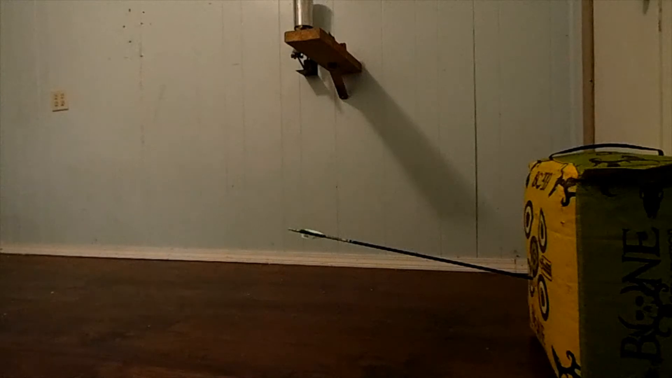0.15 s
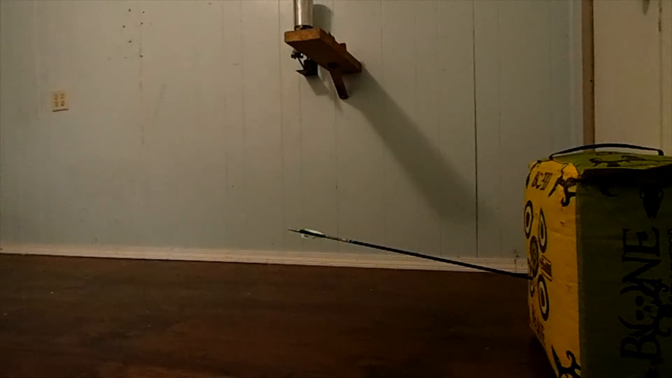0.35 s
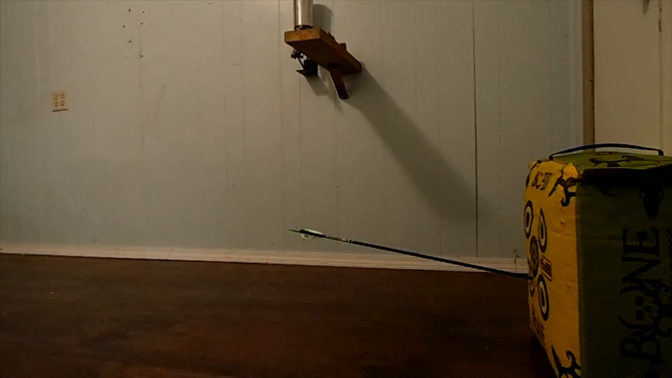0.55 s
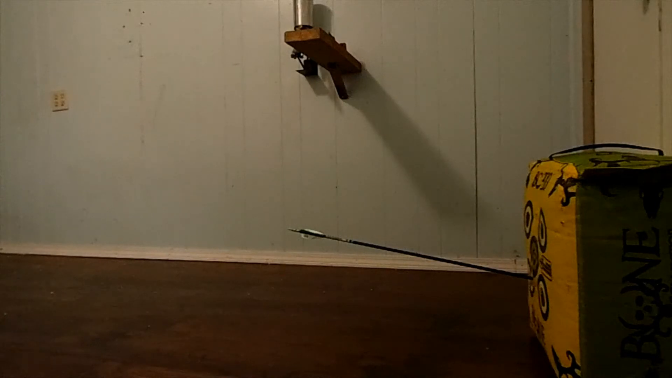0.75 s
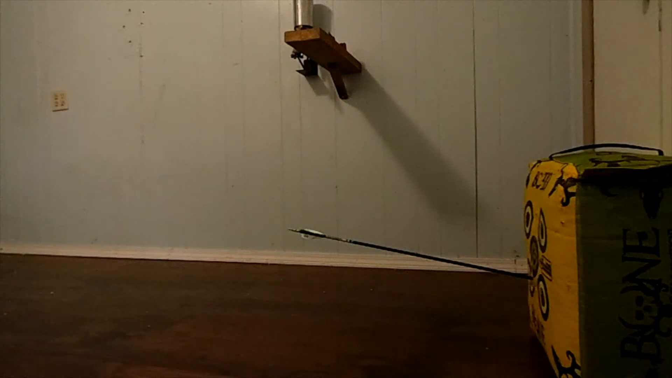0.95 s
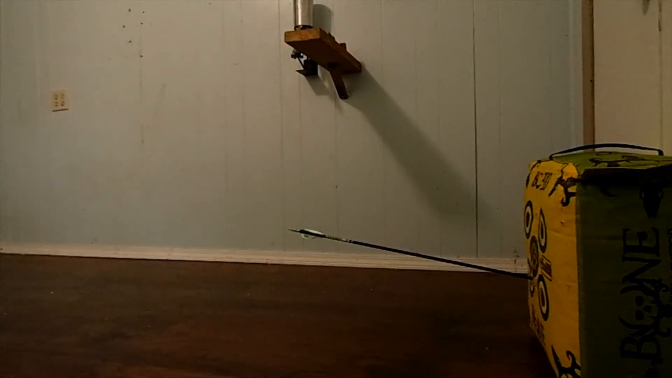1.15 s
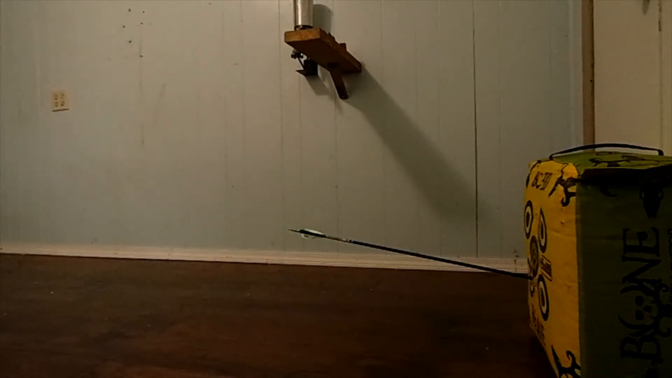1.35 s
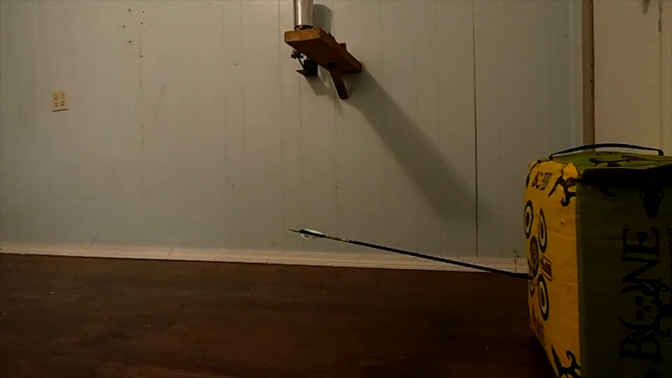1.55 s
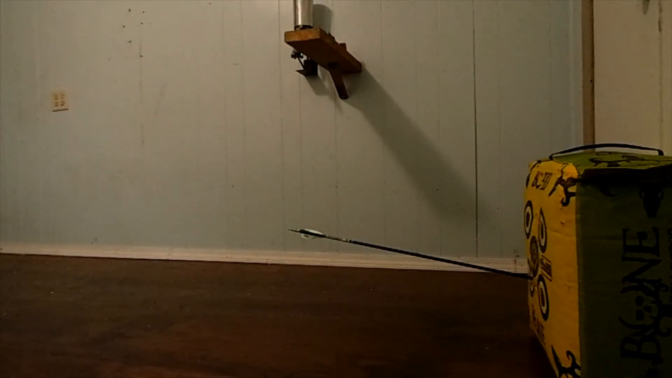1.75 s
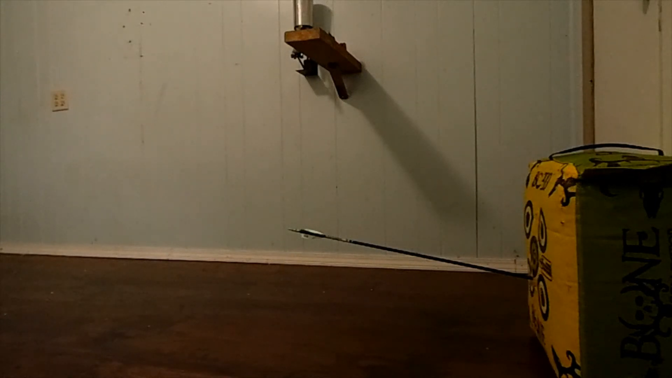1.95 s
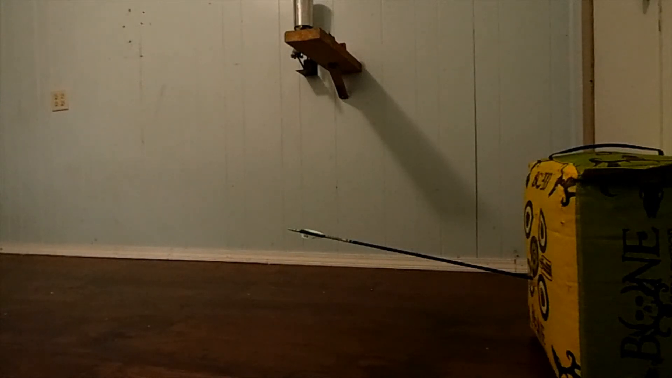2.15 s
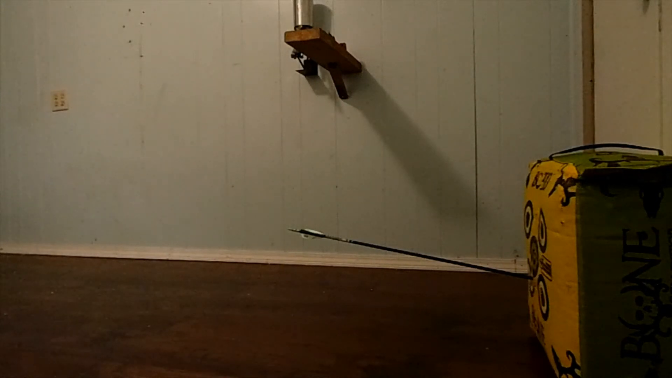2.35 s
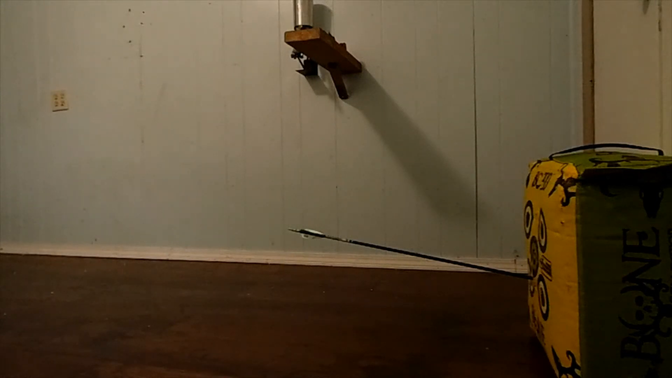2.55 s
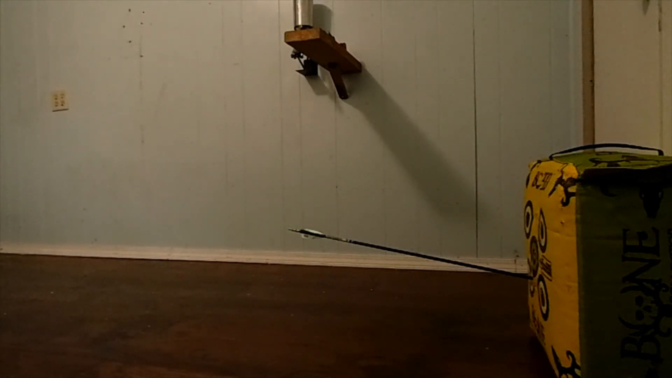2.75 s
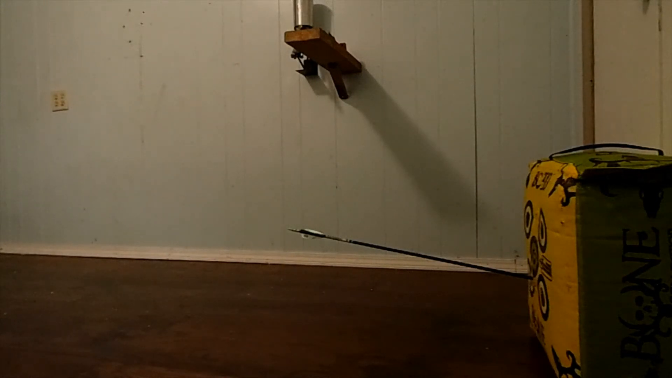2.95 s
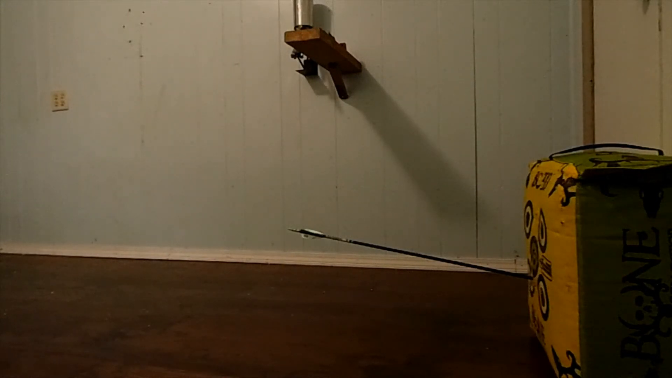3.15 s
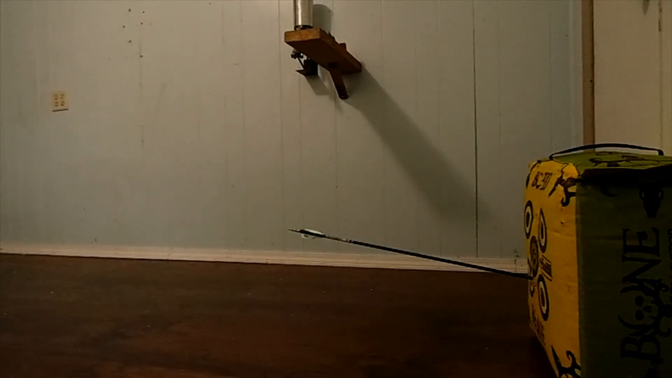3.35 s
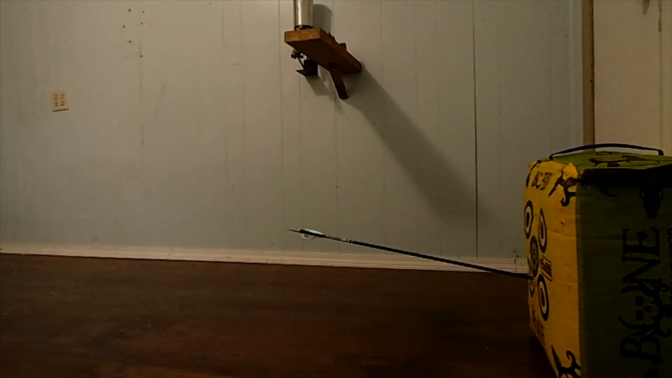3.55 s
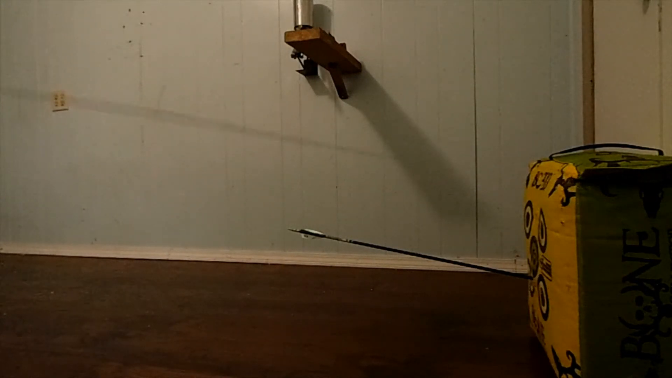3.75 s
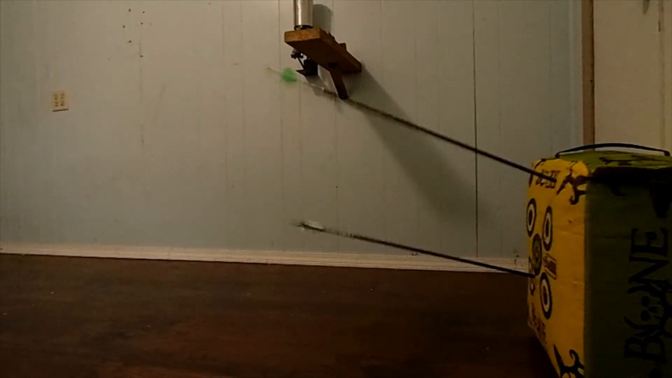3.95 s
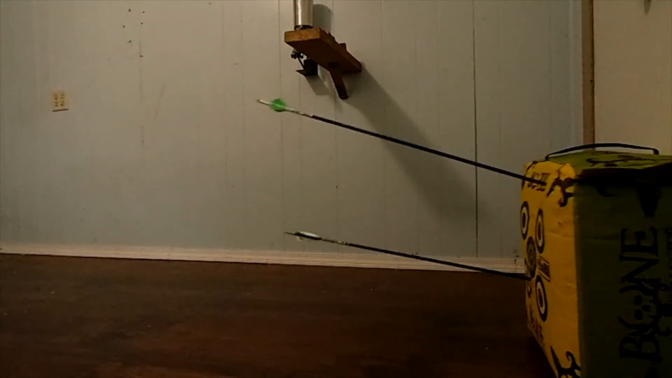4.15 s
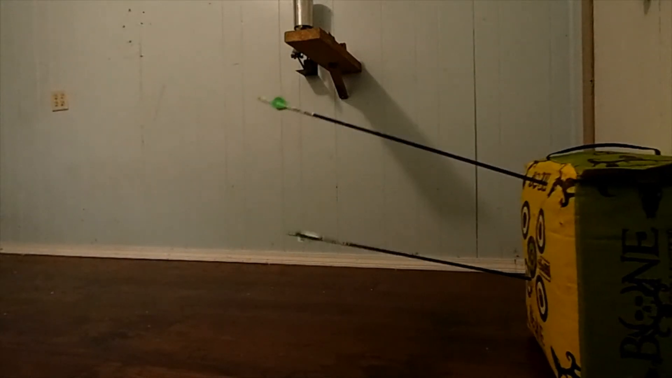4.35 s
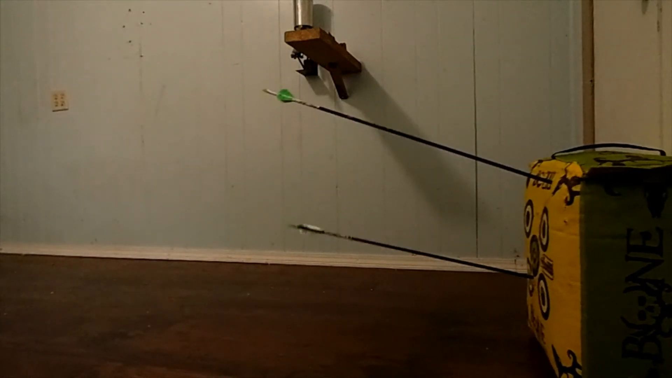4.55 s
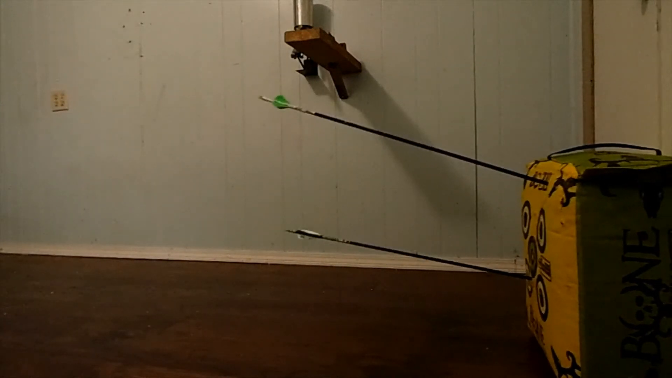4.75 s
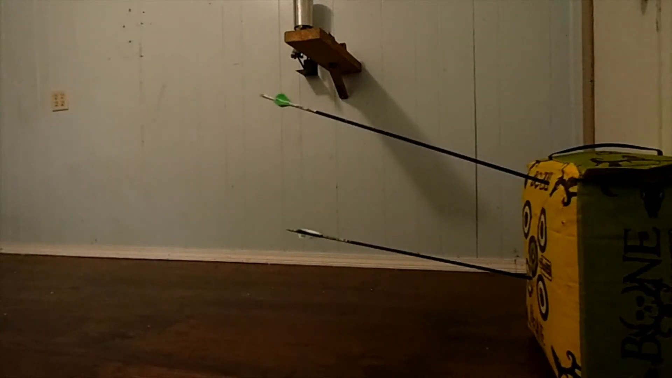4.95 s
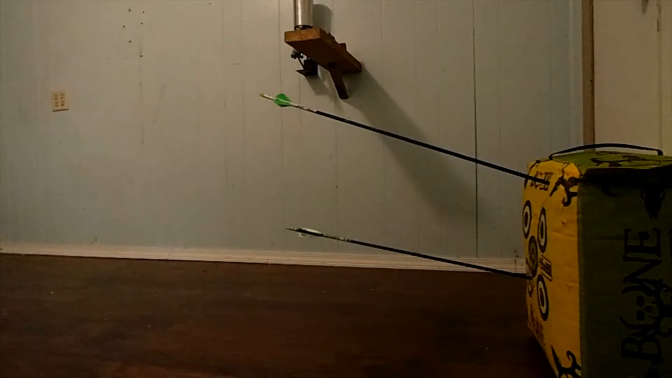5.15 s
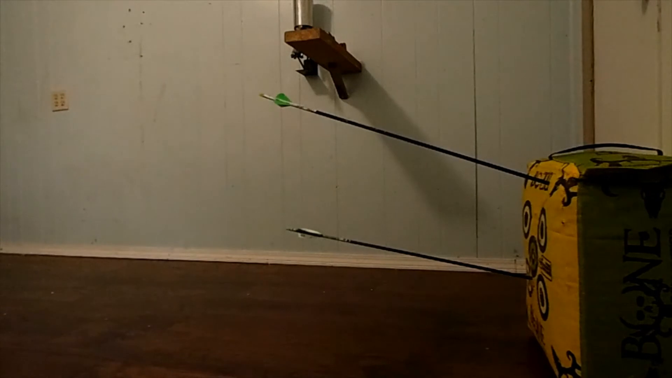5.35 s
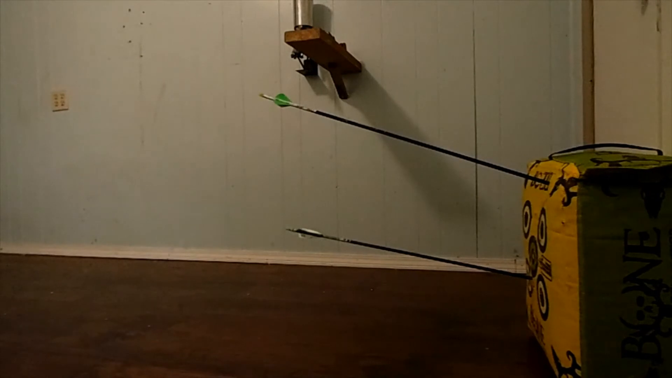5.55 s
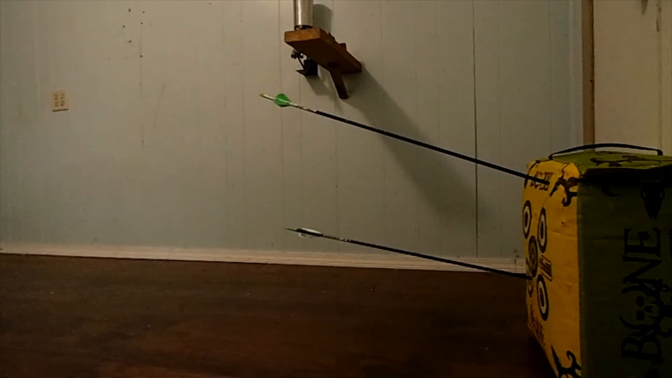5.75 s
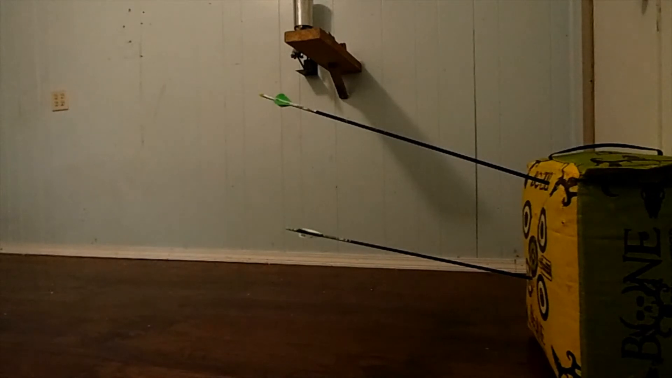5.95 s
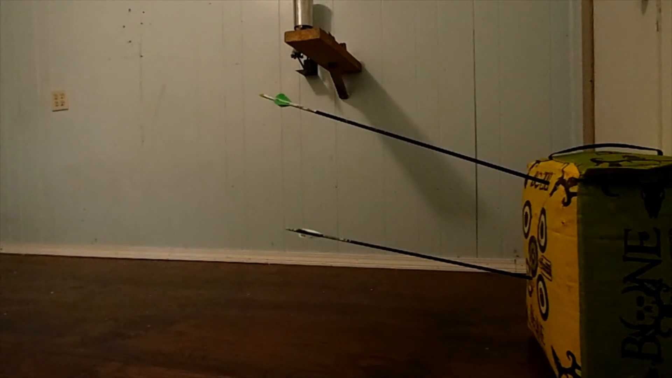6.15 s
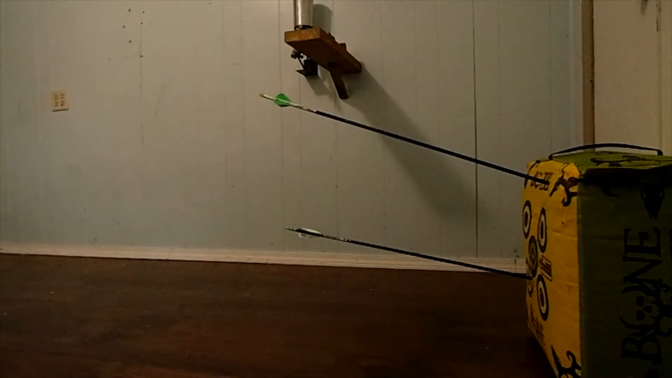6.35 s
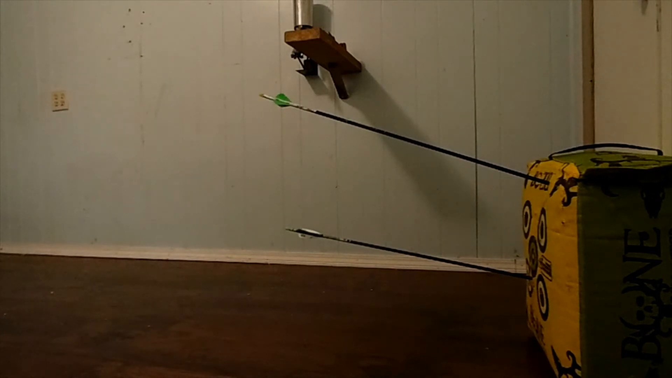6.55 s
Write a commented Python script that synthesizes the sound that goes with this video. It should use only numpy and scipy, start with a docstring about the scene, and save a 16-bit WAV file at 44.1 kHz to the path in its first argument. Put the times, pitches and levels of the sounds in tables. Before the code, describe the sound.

An arrow is shot indoors into a foam block close to the microphone. Faint bumps and a few hollow wooden knocks precede the sharp snap of the bow, heard from across the room. A short rush of air ends in a very loud, slightly distorted thud that rings between the walls. Low thumps and tiny ticks follow as the block and arrow settle, then a lone wooden knock over faint hiss.

```python
"""An arrow shot indoors

In a bare, echoing room, soft bumps, a run of hollow wooden ticks and one knock come first.
A bowstring cracks, and the arrow hisses across and thuds into a foam block beside the microphone,
overloading it. The block rocks on the floor, the shaft rattles faintly, and a last knock follows."""
import sys
import numpy as np
from scipy import signal
from scipy.fft import rfft, irfft
from scipy.io import wavfile
from scipy.ndimage import uniform_filter1d

SR = 44100
rng = np.random.default_rng(int(sys.argv[2]) if len(sys.argv) > 2 else 0)


def to_wav(sig):
    """Store sig (one row per channel, or 1-D mono) as 16-bit WAV at the path in sys.argv[1].

    Samples outside -1..1 are clipped; the rate is SR.
    """
    pcm = np.clip(np.atleast_2d(sig), -1, 1) * 32767
    pcm = np.round(pcm).astype(np.int16)
    wavfile.write(sys.argv[1], SR, pcm.T)  # frames by channels


N = 291942


def amp(db):
    """Turns decibels into a number to multiply by."""
    return 10 ** (np.asarray(db) / 20)


def seconds(count):
    """The time of each sample."""
    return np.arange(count) / SR


def fade(t, t60):
    """A smooth fade that falls 60 dB in t60 seconds, the 'fade time'."""
    return np.exp(-np.log(1000) * t / t60)


def add(mix, start_s, sound):
    """Mixes a sound in at the given time."""
    part = mix[round(start_s * SR):][:len(sound)]
    part += sound[:len(part)]


def curve_at(points, hz):
    """Joins the points with straight lines on a log-frequency axis."""
    freqs, values = np.transpose(points)
    return np.interp(np.log(hz + 1), np.log(freqs + 1), values)


def colour(x, spectrum, size=8192):
    """Turns each frequency up or down without smearing the sound earlier in time."""
    hz = abs(np.fft.fftfreq(size, 1 / SR))
    log_gain = np.log(amp(curve_at(spectrum, hz)))
    response = np.exp(np.conj(signal.hilbert(log_gain)))
    taps = np.fft.ifft(response).real[:size // 2]
    return signal.oaconvolve(x, taps)[:len(x)]


def noise(spectrum, count):
    """Noise with the given tone colour and an average (rms) size of 1."""
    gain = amp(curve_at(spectrum, np.fft.rfftfreq(count, 1 / SR)))
    x = irfft(rfft(rng.standard_normal(count)) * gain, count)
    return x / np.sqrt(np.mean(x ** 2) + 1e-20)


def crack(spectrum, t60):
    """A very short burst of noise."""
    t = seconds(SR // 4)
    return noise(spectrum, len(t)) * fade(t, t60)


def ring(tones, tilt_db=0):
    """The fading tones of something struck; tilt_db lifts the treble by that much per octave."""
    t = seconds(2 * SR)
    return sum(amp(db + tilt_db * np.log2(hz / 400)) * fade(t, t60) * np.sin(2 * np.pi * hz * t)
               for hz, db, t60 in tones)


# how long the room's echo lasts: (frequency [Hz], fade time [s])
ROOM_FADE = [(40, 1.6), (100, 1.2), (220, 0.98), (450, 0.97), (1000, 1.2), (2000, 1.072), (4000, 0.89),
             (8000, 0.47), (15000, 0.13)]


def die_away(x, stretch):
    """Fades x as the room does, treble first; stretch multiplies the fade times."""
    t, hz, spectrum = seconds(len(x)), np.fft.rfftfreq(len(x), 1 / SR), rfft(x)
    centres, t60s = np.transpose(ROOM_FADE)
    bands = [curve_at(np.c_[centres, row], hz) for row in np.eye(len(ROOM_FADE))]
    return sum(irfft(spectrum * band, len(x)) * fade(t, t60 * stretch) for band, t60 in zip(bands, t60s))


# tone colour of the quiet room: (frequency [Hz], level [dB])
ROOM_TONE_COLOUR = [(12, -29), (20, -1), (38, -18.5), (138, -17.5), (210, -18), (300, -20.5), (558, -24),
                    (1090, -25), (1810, -25.5), (9400, -33.5), (16000, -44)]


def room_tone(level_db=-54.3):
    """Faint steady hiss and rumble."""
    return noise(ROOM_TONE_COLOUR, N) * amp(level_db)


# dull bumps across the room: (time [s], level [dB])
BUMP_TIMES = [(.03, -45.5), (.145, -45), (.2, -48.5), (0.249, -48), (.45, -52)]
# their tone colour: (frequency [Hz], level [dB])
BUMP_COLOUR = [(40, -30), (110, -19), (170, -4), (260, -5), (420, -13.5), (900, -14), (2500, -14),
               (16000, -65)]


def bumps(build_s=0.0046):
    """Soft low bumps, heard only through the room's echo."""
    out, t = np.zeros(N), seconds(SR)
    swell = 1 - np.exp(-t / build_s)
    for start_s, db in BUMP_TIMES:
        add(out, start_s, amp(db) * die_away(noise(BUMP_COLOUR, len(t)), stretch=0.89) * swell)
    return out


# hollow wooden knocks: (time [s], level [dB])
KNOCK_TIMES = [(0.7348, -26.5), (0.7828, -28.5), (0.8248, -28.5), (0.8809, -28.5), (0.9469, -26.5),
               (1.0101, -27), (2.0453, -21.5), (6.2802, -21)]
# the tones the wood rings with: (frequency [Hz], level [dB], fade time [s])
WOOD_TONES = [(125, -31, 0.07), (303, -33, 0.021), (339, -1.5, 0.029), (453, 0.5, 0.062),
              (556, -20.5, 0.028), (739, -1.5, 0.04), (990, -9.5, 0.015), (1345, -8.5, 0.0053),
              (2085, -17, 0.013), (2700, -21.5, 0.005)]
# tone colour of the tick at contact: (frequency [Hz], level [dB])
TICK_COLOUR = [(200, -20), (1000, -5), (1500, -1), (2250, 3), (2900, -2), (4000, -5), (5200, -7),
               (7000, -17), (16000, -36)]
# how well the wood passes sound to the air: (frequency [Hz], level [dB])
WOOD_TO_AIR = [(30, -22), (60, -14), (125, 0), (200, -8), (310, 0), (750, 0), (1300, -.5), (2200, 1),
               (3000, -3), (4000, -4.5), (5000, -4), (7000, -10), (16000, -20)]
# nearby surfaces throw each knock back: (delay [s], strength [ratio])
NEAR_ECHOES = [(.0031, 0.68), (.0085, 0.086), (.0275, .1), (0.0367, 0.32)]
# tone colour of the knocks' long echo: (frequency [Hz], level [dB])
KNOCK_ECHO_COLOUR = [(100, -7), (300, -8), (450, -8.5), (580, 0.5), (740, -12.5), (1000, 0), (1700, 0.5),
                     (2700, 3.5), (5000, 5.5), (8000, -5)]


def knocks(soft_db=-27, tilt_per_db=0.45, tick_db=-16, room_db=-3, build_s=0.0073):
    """Each knock ticks and rings the same wood; nearby surfaces and the room answer."""
    direct, tick = np.zeros(N), crack(TICK_COLOUR, t60=0.042)
    for start_s, db in KNOCK_TIMES:
        tilt_db = tilt_per_db * (db - soft_db)  # a harder knock is brighter
        add(direct, start_s, amp(db) * ring(WOOD_TONES, tilt_db))
        add(direct, start_s, amp(db + tick_db + 2 * tilt_db) * tick)
    direct = colour(direct, WOOD_TO_AIR)
    near = direct.copy()
    for delay_s, strength in NEAR_ECHOES:
        add(near, delay_s, strength * direct)
    t = seconds(2 * SR)
    swell = 1 - np.exp(-t / build_s)
    echo = die_away(rng.standard_normal(len(t)), stretch=0.82) * swell
    echo = colour(echo / np.linalg.norm(echo), KNOCK_ECHO_COLOUR)
    return near + amp(room_db) * signal.oaconvolve(direct, echo)[:N]


# the arrow's shaft rattles in its hole: (time [s], level [dB])
RATTLE_TIMES = [(4.564, -45), (4.571, -40), (4.689, -49), (5.036, -56), (5.161, -53), (5.183, -54)]
# tone colour of the shaft: (frequency [Hz], level [dB])
SHAFT_COLOUR = [(300, -20), (1500, -6), (3000, 7.5), (5000, 5.5), (7500, -2.5), (9500, -35), (16000, -32)]


def shaft_rattle(gain_db=6.5, room_db=-17):
    """The stuck arrow ticks in its hole, each tick with a faint echo."""
    ticks = np.zeros(N)
    for start_s, db in RATTLE_TIMES:
        add(ticks, start_s, amp(db) * crack(SHAFT_COLOUR, t60=0.041))
        add(ticks, start_s, amp(db + room_db) * die_away(noise(SHAFT_COLOUR, SR), stretch=1))
    return amp(gain_db) * ticks


# the block drops back on the floor: (time [s], level [dB])
ROCKING_TIMES = [(4.559, -32), (4.645, -21), (4.701, -23), (4.767, -26), (4.945, -36), (5.16, -43),
                 (5.385, -51), (5.6, -52)]
# the floorboards' low tones: (frequency [Hz], level [dB], fade time [s])
FLOOR_TONES = [(28.1, 3, 0.61), (35, -11, 0.58), (63.5, 2, 0.34), (86, -11, 0.24), (130, -8.5, 0.21),
               (176, -13, 0.38)]


def rocking_block(gain_db=1):
    """The block thumps the floorboards as it rocks to rest."""
    thumps = np.zeros(N)
    for start_s, db in ROCKING_TIMES:
        add(thumps, start_s, amp(db) * ring(FLOOR_TONES))
    return amp(gain_db) * thumps


# the string slides, snaps home and the bow's arms stop: (time [s], crack level [dB], echo level [dB])
RELEASE_TIMES = [(3.824, -62, -40.5), (3.8562, -20, -21), (3.8726, -24, -17), (3.8791, -25, -28)]
# tone colour of the bow: (frequency [Hz], level [dB])
BOW_COLOUR = [(30, -11.5), (100, -3), (350, 4.5), (700, -1.5), (1000, -1), (1300, -1), (2000, -3),
              (3100, -1.5), (5000, -7), (7500, -14), (10000, -36), (16000, -34.5)]


def bow():
    """The bow's string and arms crack across the room, heard mostly as echo."""
    out = np.zeros(N)
    for start_s, crack_db, echo_db in RELEASE_TIMES:
        add(out, start_s, amp(crack_db) * crack(BOW_COLOUR, t60=0.052))
        add(out, start_s, amp(echo_db) * die_away(noise(BOW_COLOUR, 2 * SR), stretch=0.94))
    return out


# tones of the small parts fixed to the bow: (frequency [Hz], level [dB], fade time [s])
BOW_PART_TONES = [(249, -4, .6), (1510, -4, 0.29), (2946, -4.5, .1), (3120, 1, .1)]


def bow_parts(gain_db=-20):
    """Small parts on the bow ring brightly as its arms stop."""
    out, stop_s = np.zeros(N), RELEASE_TIMES[-1][0]
    add(out, stop_s, amp(gain_db) * ring(BOW_PART_TONES))
    return out


HIT_S = 4.0518  # when the arrow lands
# tone colour of air rushing past the arrow's fins: (frequency [Hz], level [dB])
FIN_COLOUR = [(100, -14), (400, 1.5), (1000, 5.5), (2500, -10), (6000, -6), (8000, -29.5), (15000, -39.5)]


def arrow_flight(flight_s=0.115, arrival_db=-25, rise_db_per_s=40.5):
    """The hiss of the fins grows as the arrow nears and stops at the hit."""
    out, t = np.zeros(N), seconds(round(flight_s * SR))
    hiss = noise(FIN_COLOUR, SR)[:len(t)]
    level_db = arrival_db - rise_db_per_s * (flight_s - t)
    add(out, HIT_S - flight_s, hiss * amp(level_db))
    return out


# the foam block's own boom: (frequency [Hz], level [dB], fade time [s])
BLOCK_TONES = [(76.5, 5.5, 0.19), (381.8, 15.5, 0.11), (467.7, 15.5, 0.059), (594, 15.5, 0.063)]
# tone colour of the hit as it fills the room: (frequency [Hz], level [dB])
HIT_COLOUR = [(20, -16.5), (45, -17.5), (82, -11.5), (160, -14), (250, -3.5), (380, 3), (580, 1), (850, -6),
              (1150, -14.5), (1600, -13), (2500, -21), (4200, -23.5), (7000, -37), (11000, -43.5),
              (16000, -50.5)]
# tones that linger between the walls: (frequency [Hz], level [dB], fade time [s])
WALL_TONES = [(81.2, -5, .5), (112.5, -7, .5), (330.7, -5, 0.94), (388.6, 0, .8), (559, -2.5, .8),
              (606.3, -4, .8), (788.4, -6, 0.77)]


def arrow_hit(echo_db=11, hum_db=2, build_s=0.014):
    """The arrow makes the foam block boom, and the room swells and hums behind it."""
    out, t = np.zeros(N), seconds(2 * SR)
    echo = amp(echo_db) * die_away(noise(HIT_COLOUR, len(t)), stretch=0.95)
    hum = amp(hum_db) * ring(WALL_TONES)
    swell = 1 - np.exp(-t / build_s)
    add(out, HIT_S, ring(BLOCK_TONES) + (echo + hum) * swell)
    return out


def scene():
    """All the sounds added into one channel."""
    return (bumps() + knocks() + bow() + bow_parts() + arrow_flight() + arrow_hit()
            + rocking_block() + shaft_rattle() + room_tone())[None]


def gain_control(x, loud_db=-12, cut_db_per_s=6, recover_s=12):
    """Turns the volume down steadily while the sound is loud, then lets it creep back."""
    is_loud = uniform_filter1d(x ** 2, size=1024) > amp(loud_db) ** 2
    hold = np.exp(-1 / (recover_s * SR))
    cut_db = signal.lfilter([cut_db_per_s / SR], [1, -hold], is_loud.astype(float))
    return x * amp(-cut_db)


# the microphone's own tone colour: (frequency [Hz], level [dB])
MIC_COLOUR = [(20, 0), (10800, 2.5), (11600, -2.5), (12200, -11), (12900, 2), (14000, 4), (16000, 1.5)]


def record(dry, ceiling=0.83, top_hz=16100):
    """The overloaded microphone flattens the hit's peaks, colours the sound and loses the top treble."""
    clipped = np.clip(dry[0], -ceiling, ceiling)
    coloured = colour(gain_control(clipped), MIC_COLOUR)
    low_pass = signal.firwin(511, top_hz, window=("kaiser", 8), fs=SR)
    return signal.oaconvolve(coloured, low_pass, "same")[None]


dry = scene()
out = record(dry)
to_wav(out)
```